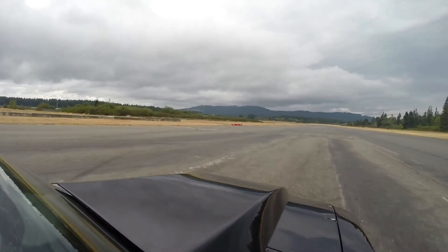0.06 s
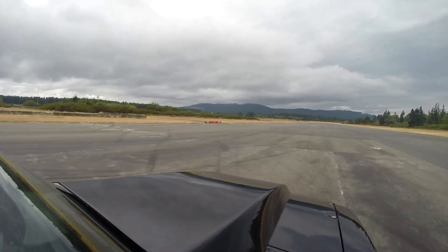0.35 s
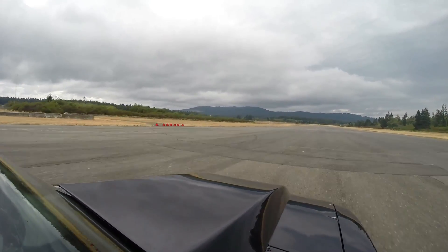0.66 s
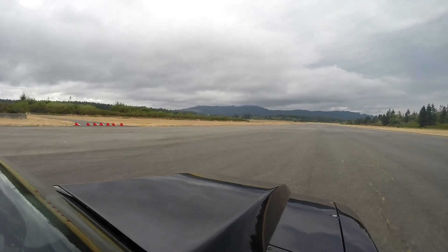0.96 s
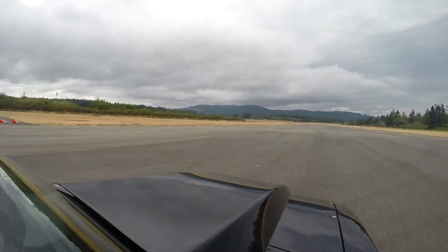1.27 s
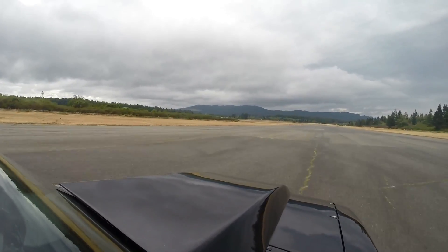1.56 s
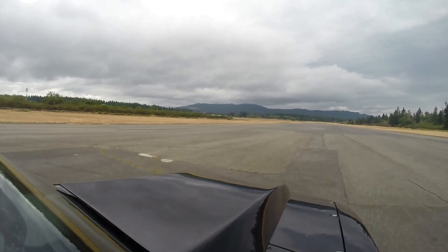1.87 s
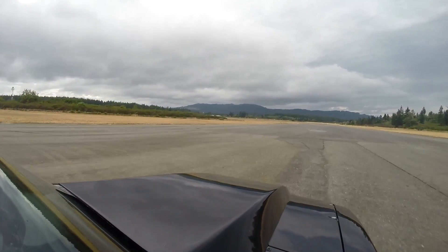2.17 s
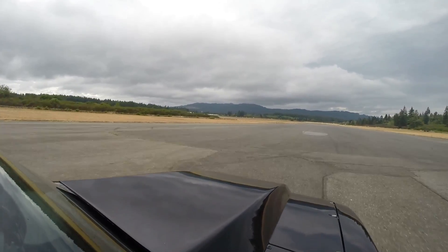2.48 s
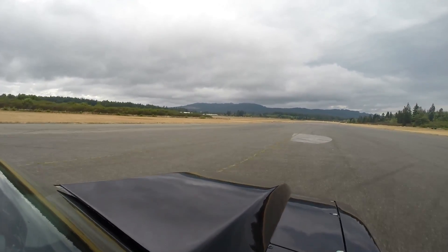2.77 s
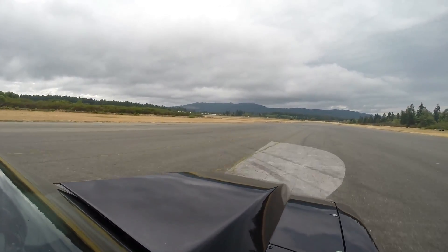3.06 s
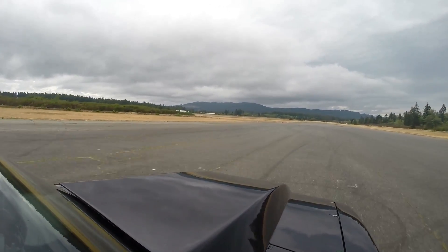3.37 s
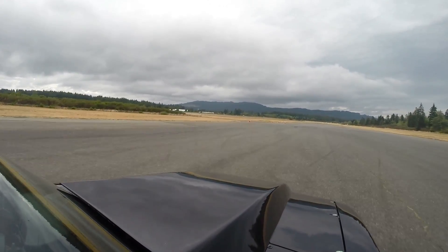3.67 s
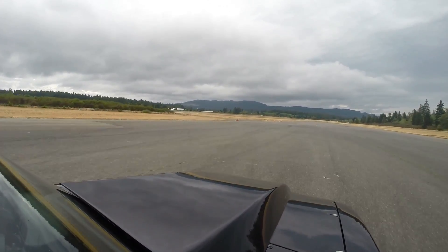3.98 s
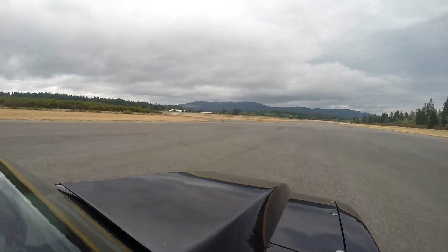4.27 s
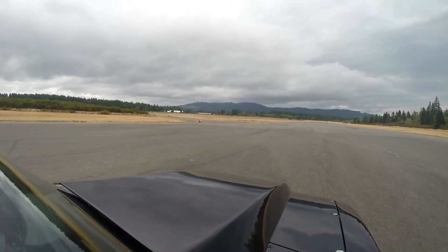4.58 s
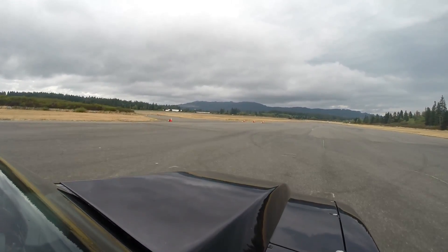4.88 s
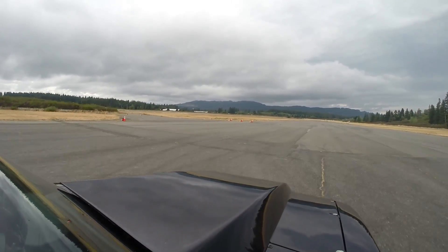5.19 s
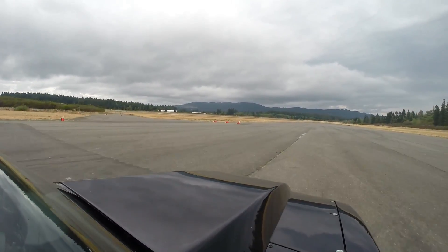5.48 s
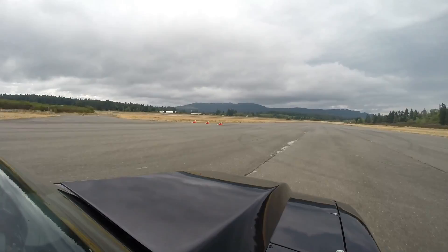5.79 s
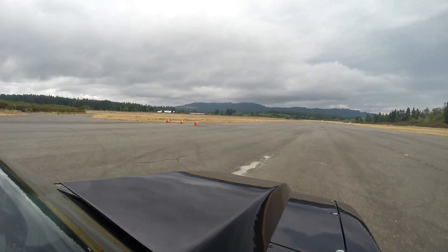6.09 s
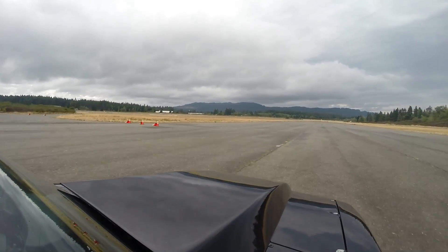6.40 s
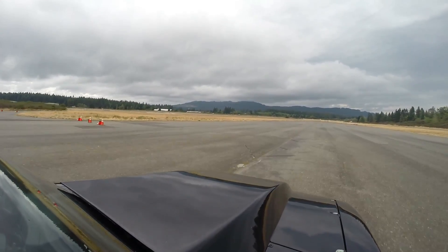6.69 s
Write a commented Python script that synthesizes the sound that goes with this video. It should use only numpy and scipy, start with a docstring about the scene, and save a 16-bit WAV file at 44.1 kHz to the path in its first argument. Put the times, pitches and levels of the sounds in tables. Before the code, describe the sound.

A turbocharged V8 race car coasts at speed, its engine note slowly sinking under gusting wind, body boom and tyre rumble.

```python
"""Race car coasting down a runway.

A turbocharged V8 at speed, heard from an outside mount just behind the bonnet. Wind gusts past the
microphone housing. Rough tarmac makes the body boom and drone. Off throttle, the engine note and a
driveline throb sink through body resonances. A thin whistle wavers on top."""
import sys
import numpy as np
from scipy import signal
from scipy.fft import rfft, irfft, next_fast_len
from scipy.io import wavfile
from scipy.ndimage import uniform_filter1d, minimum_filter1d

SR = 44100
rng = np.random.default_rng(int(sys.argv[2]) if len(sys.argv) > 2 else 0)


def to_wav(sig):
    """Store sig (one row per channel, or 1-D mono) as 16-bit WAV at the path in sys.argv[1].

    Samples outside -1..1 are clipped; the rate is SR.
    """
    pcm = np.clip(np.atleast_2d(sig), -1, 1) * 32767
    pcm = np.round(pcm).astype(np.int16)
    wavfile.write(sys.argv[1], SR, pcm.T)  # frames by channels


N = 302085

# airflow between lulls, easing as the car slows: time_s, level_db
AIRFLOW_DB = [(0, -21.5), (.3, -20), (.95, -21.5), (1.45, -22.5), (1.88, -21), (2.15, -22), (2.7, -24.6),
              (3.8, -26), (4.5, -26.5), (5.4, -28), (6.26, -29), (6.4, -33.5), (6.85, -33.5)]
# sudden drops in the wind: start_s, hold_s, recovery_s, depth_db
WIND_LULLS = [(.47, .04, .06, 2.8), (.99, .06, .18, 7), (1.33, .02, .04, 3), (1.52, .04, .11, 5.8),
              (1.99, .03, .09, 3.5), (2.168, .06, .4, 6), (2.88, .035, .05, 5), (3.03, .07, .08, 3),
              (3.3, .22, .15, 2.6)]
# wind rush spectrum: freq_hz, relative_db
RUSH_SPECTRUM = [(130, -3.5), (180, 7), (260, -3.5), (400, -4), (520, -6.5), (800, -3.5), (1020, -8),
                 (1230, -4.5), (1750, -2.5), (2550, -2), (2850, -8.5), (3400, -9), (4300, -20),
                 (6000, -30.5)]
# wind hiss spectrum: freq_hz, relative_db
HISS_SPECTRUM = [(2800, -15.5), (4300, -5.5), (5400, -2), (7100, 0), (7600, -7.5), (8300, -10.5),
                 (8850, -11.5), (9300, -17), (10300, -17.5), (11200, -25.5), (12500, -25), (15000, -46)]
# air cavities of the housing: pitch_hz, width_hz, lift_db
HOUSING_CAVITIES = [(1380, 213, 8.5), (2112, 220, 5), (3970, 130, 4.5), (4614, 45, 8), (5020, 190, 6),
                    (5940, 370, 8.5), (6910, 180, 6.5)]
# mount shake between jolts: time_s, level_db
SHAKE_DB = [(0, -27.5), (2.4, -17), (3.7, -26), (4.8, -29), (6.85, -28)]
# jolts of the mount: centre_s, length_s, lift_db
MOUNT_JOLTS = [(.44, 0.23, 5.5), (.77, .25, 7.5), (2.43, 0.23, -2), (4.45, .2, 8), (5.59, 0.17, 8),
               (5.82, 0.27, 7), (6.42, .3, 9)]
# body boom between bumps: time_s, level_db
BOOM_DB = [(0, -17), (.42, -24), (.9, -18.5), (1.9, -21), (2.6, -22), (3.4, -19), (4.1, -21.5),
           (5.7, -18.5), (6.85, -25)]
# big bumps that swell the boom: centre_s, length_s, lift_db
ROAD_BUMPS = [(1.03, 0.11, 5), (1.35, 0.078, 8.5), (1.52, 0.078, 8), (1.78, 0.049, 9.5), (1.98, 0.34, 6.5),
              (2.89, 0.09, 11.5), (3.31, 0.085, 2), (3.91, 0.079, 7.5), (4.09, 0.083, 11.5),
              (4.42, 0.17, 5.5), (4.71, 0.21, 7.5), (4.95, 0.12, 8), (5.23, 0.23, 9), (5.66, 0.079, 7.5),
              (6.34, 0.12, 8.5), (6.54, 0.066, 9), (6.78, .18, 10)]
# panel drone between flares: time_s, level_db
DRONE_DB = [(0, -22), (1.3, -28.5), (2, -24.5), (3.4, -27), (4.2, -22), (5.3, -23.5), (5.9, -22.5),
            (6.85, -21.5)]
# brief flares of the drone: centre_s, length_s, lift_db
DRONE_FLARES = [(1.87, .1, 5), (2.72, 0.13, 5), (2.87, 0.048, 7), (3.85, 0.05, 5.5), (4.17, 0.029, 5),
                (4.51, 0.068, 3.5), (4.86, .09, 5.5), (5.1, 0.074, 13), (5.31, 0.038, 6.5),
                (5.44, 0.073, 9), (5.71, 0.071, 8.5), (6.29, 0.079, 3)]
# tyre rumble: time_s, level_db
TYRE_DB = [(0, -26), (.5, -26), (1.5, -24), (2.3, -26), (2.7, -19), (3.1, -26), (3.5, -27), (4.2, -23),
           (5, -21), (5.4, -25.5), (6.1, -22.5), (6.85, -25)]
# tyre rumble spectrum: freq_hz, relative_db
TYRE_SPECTRUM = [(15, -16), (35, -5.5), (70, 4.5), (86, 4.5), (110, 4), (135, 0), (160, -10.5), (185, 2.5),
                 (240, -9.5), (290, -6), (330, -8), (380, -11.5), (450, -17.5), (800, -36.5)]
# exhaust tone through pipes and body: pitch_hz, level_db
EXHAUST_DB = [(114, -18.5), (123, -22), (131, -31), (140, -26.5), (156, -28.5), (170, -42), (182, -29.5),
              (199, -27.5), (209, -21), (228, -22), (240, -15), (251, -19.5), (260, -30), (310, -37),
              (420, -51)]
# weak engine and driveline tones: firing_multiple, level_db
WEAK_TONES = [(.5, -43), (.82, -38), (.905, -43), (1.11, -35), (1.5, -39), (3, -58)]
# driveline throb through the body: pitch_hz, level_db
THROB_DB = [(42, -38.5), (49, -23), (53, -33), (57, -14), (60, -20.5), (65, -25), (70, -30.5), (76, -44)]
# whistle arches: start_s, crest_s, end_s, top_hz, fall_hz, level_db, fade_db
WHISTLE_ARCHES = [(-.05, .3, 1.52, 10390, 440, -58.5, 3), (1.48, 1.78, 2.21, 10110, 240, -60.5, 3),
                  (2.5, 2.7, 3.05, 10880, 110, -71, 2), (3.53, 3.72, 3.92, 10860, 150, -74, 1),
                  (3.87, 3.9, 4.9, 10620, 700, -64, 6), (4.97, 5.15, 6.2, 10470, 850, -65, 10)]


def from_db(db):
    """Decibels to gain."""
    return 10 ** (np.asarray(db) / 20)


def unit_rms(x):
    """Scale to rms 1."""
    return x / np.sqrt(np.mean(x ** 2) + 1e-20)


def curve(rows):
    """Level curve at every sample."""
    return np.interp(np.arange(N) / SR, *np.transpose(rows))


def drift(corner_hz):
    """Slow random wander, rms 1."""
    hz = np.fft.rfftfreq(N, 1 / SR)
    return unit_rms(irfft(rfft(rng.standard_normal(N)) / (1 + (hz / corner_hz) ** 2), N))


def coloured_noise(spectrum):
    """Shaped noise, rolled off beyond the spectrum's ends; rms 1."""
    size = next_fast_len(N)
    hz = np.maximum(np.fft.rfftfreq(size, 1 / SR), 1)
    points_hz, db = np.transpose(spectrum)
    rolloff = np.minimum(hz / points_hz[0], 1) ** 2 * np.minimum(points_hz[-1] / hz, 1) ** 2
    gain = from_db(np.interp(np.log(hz), np.log(points_hz), db)) * rolloff
    return unit_rms(irfft(rfft(rng.standard_normal(size)) * gain, size)[:N])


def resonate(x, hz, width_hz):
    """Two-pole resonance, peak gain 1."""
    r = np.exp(-np.pi * width_hz / SR)
    feedback = [1, -2 * r * np.cos(2 * np.pi * hz / SR), r * r]
    return signal.lfilter(np.array([1, 0, -1]) * (1 - r * r) / 2, feedback, x)


def lulls_db(drop_s=.025):
    """Loss of wind: quick drop, hold, slower recovery."""
    t = np.arange(N) / SR
    return sum(depth_db * np.interp(t - start_s, np.cumsum([0, drop_s, hold_s, recovery_s]), [0, 1, 1, 0])
               for start_s, hold_s, recovery_s, depth_db in WIND_LULLS)


def housing(air):
    """Each cavity lifts the air noise around its own pitch; rms 1."""
    for hz, width_hz, lift_db in HOUSING_CAVITIES:
        air = air + (from_db(lift_db) - 1) * resonate(air, hz, width_hz)
    return unit_rms(air)


def wind(rush_trim_db=.58, hiss_trim_db=-10.5, hiss_swing=.88):
    """Turbulent air sounds the housing; small eddies flutter within each gust."""
    gust_db = curve(AIRFLOW_DB) - lulls_db() + .5 * drift(17)
    eddies = drift(45)
    rush_db = gust_db + rush_trim_db + .43 * eddies
    hiss_db = gust_db.mean() + hiss_swing * (gust_db - gust_db.mean()) + hiss_trim_db + .48 * eddies
    rush = from_db(rush_db) * housing(coloured_noise(RUSH_SPECTRUM))
    hiss = from_db(hiss_db) * housing(coloured_noise(HISS_SPECTRUM))
    return rush + hiss


def swells_db(rows):
    """Rounded level changes, each centred on its time."""
    t = np.arange(N) / SR
    return sum(lift_db * np.exp(-np.minimum(np.abs(t - centre_s) / (length_s / 2), 5) ** 3)
               for centre_s, length_s, lift_db in rows)


def body_mode(level_db, hz, width_hz, smooth_s, reach_hz):
    """Random jolts keep one mode ringing; it is evened out, then follows level_db."""
    size = next_fast_len(N + SR)
    jolts = rng.standard_normal(N + SR)  # 1 s lead-in
    ringing = resonate(resonate(jolts, hz, width_hz), hz, width_hz)
    power = uniform_filter1d(np.abs(signal.hilbert(ringing, size)) ** 2, int(smooth_s * SR))
    swelling = from_db(level_db) * unit_rms(ringing[SR:] / np.sqrt(power[SR:SR + N] + 1e-20))
    # inertia keeps sudden swells near the mode's pitch
    detuning = np.abs(np.fft.rfftfreq(size, 1 / SR) - hz) / reach_hz
    return irfft(rfft(swelling, size) / np.sqrt(1 + detuning ** 6), size)[:N]


def body():
    """The road shakes the mount and rings body and panels; a small panel adds a steady hollow tone."""
    shake_db = curve(SHAKE_DB) + swells_db(MOUNT_JOLTS) + 2 * drift(4.5)
    boom_db = curve(BOOM_DB) + swells_db(ROAD_BUMPS) + 1.5 * drift(12)
    drone_db = curve(DRONE_DB) + swells_db(DRONE_FLARES) + 1.54 * drift(20)
    shake = body_mode(shake_db, hz=21, width_hz=6, smooth_s=.08, reach_hz=5.5)
    boom = body_mode(boom_db, hz=52.8, width_hz=11.7, smooth_s=.089, reach_hz=22)
    drone = body_mode(drone_db, hz=238, width_hz=31.4, smooth_s=.1, reach_hz=41)
    hollow = resonate(coloured_noise([(300, 0), (900, 0)]), hz=683, width_hz=87)
    return shake + boom + drone + from_db(-41.5) * unit_rms(hollow)


def tyres():
    """Tyres rumble on rough tarmac."""
    return from_db(curve(TYRE_DB) + drift(7.3)) * coloured_noise(TYRE_SPECTRUM)


def firing_rate_hz(start_hz=210.7, sag_hz_per_s=17.1, easing_hz_per_s2=.864):
    """Coasting in gear, the revs sink ever more slowly."""
    t = np.arange(N) / SR
    return start_hz - sag_hz_per_s * t + easing_hz_per_s2 * t ** 2 / 2


def engine(jitter_turns=.028, flutter_db=1.3, uneven_db=4, burble=.12):
    """Soft off-throttle firings: a note and its octave sink through resonances, beside weak tones."""
    firing_hz = firing_rate_hz()
    turns = np.cumsum(firing_hz) / SR + jitter_turns * drift(7)
    tones = [(multiple, np.interp(multiple * firing_hz, *np.transpose(EXHAUST_DB)) + flutter_db * drift(24))
             for multiple in (1, 2)]
    tones += [(multiple, db + uneven_db * drift(2.4)) for multiple, db in WEAK_TONES]
    note = sum(np.sqrt(2) * from_db(db) * np.sin(2 * np.pi * (multiple * turns + rng.random()))
               for multiple, db in tones)
    # unequal firings make the note burble
    firings = np.arange(int(turns.max()) + 2)
    strength = 1 + burble * rng.standard_normal(len(firings))
    return note * np.interp(turns, firings, strength)


def driveline(turns_per_firing=.362, jitter_turns=.03, flutter_db=.4):
    """A throb geared to the engine, likely the driveshaft, swells as it sinks through a body resonance."""
    shaft_hz = turns_per_firing * firing_rate_hz()
    level_db = np.interp(shaft_hz, *np.transpose(THROB_DB)) - flutter_db * drift(8)
    turns = np.cumsum(shaft_hz) / SR + jitter_turns * drift(3.2)
    return np.sqrt(2) * from_db(level_db) * np.sin(2 * np.pi * turns)


def whistle(waver_hz=28, wander_hz=20, edge_s=.04):
    """A faint high whistle, likely the turbo, catches, wavers and sinks away several times."""
    t = np.arange(N) / SR
    detune_hz = waver_hz * drift(35) + wander_hz * drift(5)
    flicker_db = 2 * drift(20)
    out = np.zeros(N)
    for start_s, crest_s, end_s, top_hz, fall_hz, level_db, fade_db in WHISTLE_ARCHES:
        past_crest = (np.clip(t, start_s, end_s) - crest_s) / (end_s - crest_s)
        gate = np.clip(np.minimum(t - start_s, end_s - t) / edge_s, 0, 1)
        gain = from_db(level_db - fade_db * np.abs(past_crest) + flicker_db)
        turns = np.cumsum(top_hz - fall_hz * past_crest ** 2 + detune_hz) / SR
        out += gate * gain * np.sin(2 * np.pi * turns)
    return np.sqrt(2) * out


def scene():
    """All sources ride with the car; one microphone."""
    return (wind() + body() + tyres() + engine() + driveline() + whistle())[None, :]


def record(dry):
    """Peak limiter, then a steep low-pass."""
    ceiling, span_samples, cutoff_hz = .8, int(.008 * SR), 15140
    gain = ceiling / np.maximum(np.abs(dry), ceiling)
    smooth_gain = uniform_filter1d(minimum_filter1d(gain, span_samples), span_samples)
    lowpass = signal.ellip(10, .1, 80, cutoff_hz, fs=SR, output="sos")
    return signal.sosfilt(lowpass, dry * smooth_gain)


dry = scene()
out = record(dry)
to_wav(out)
```